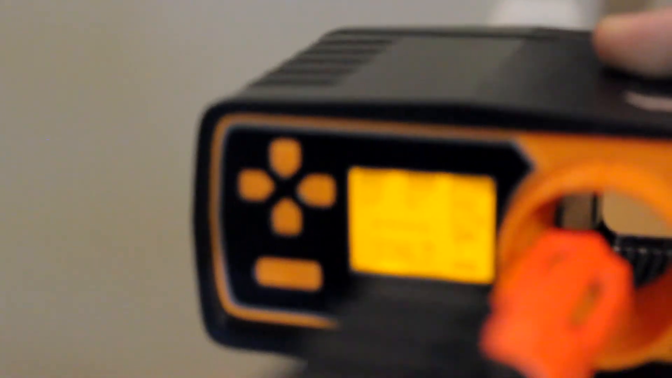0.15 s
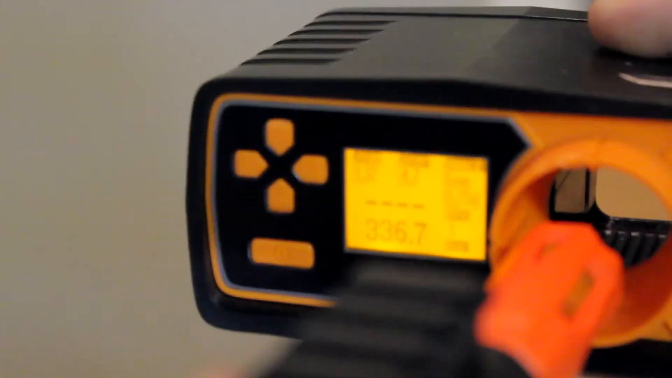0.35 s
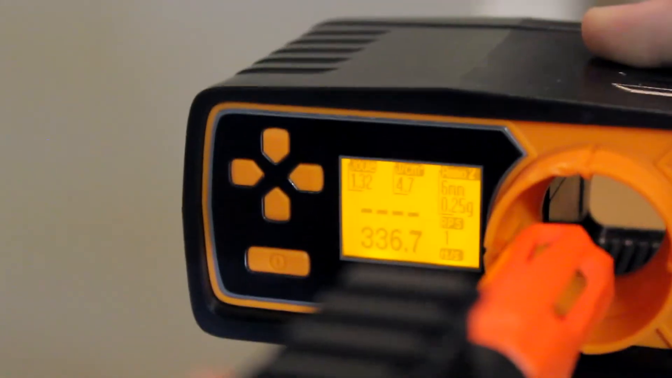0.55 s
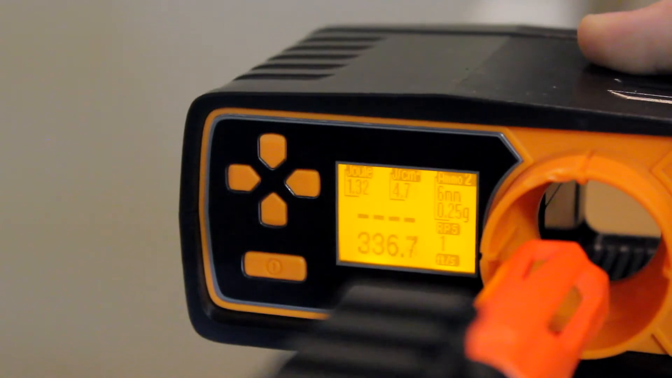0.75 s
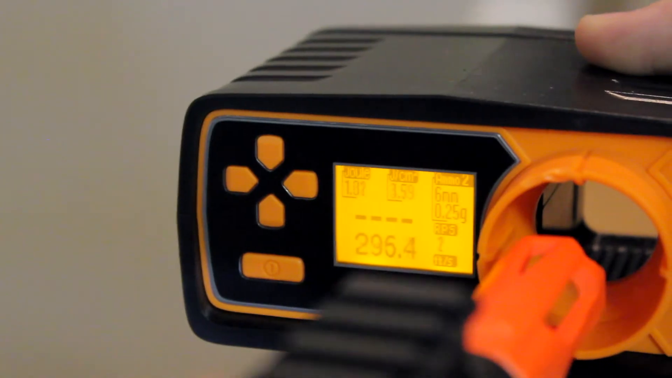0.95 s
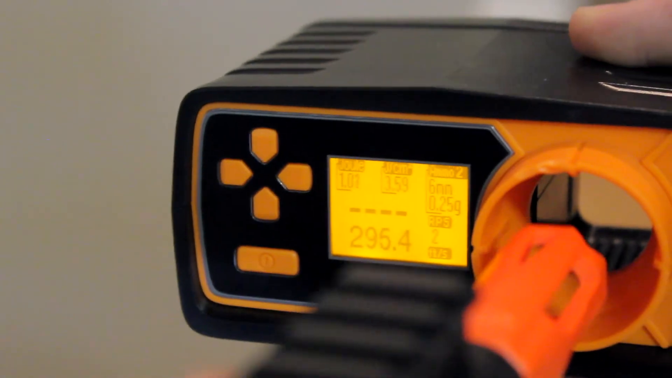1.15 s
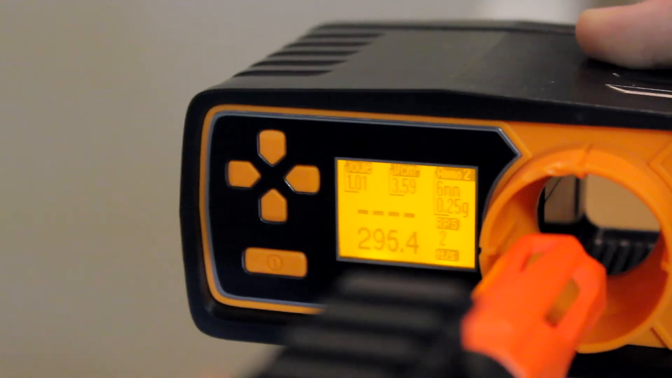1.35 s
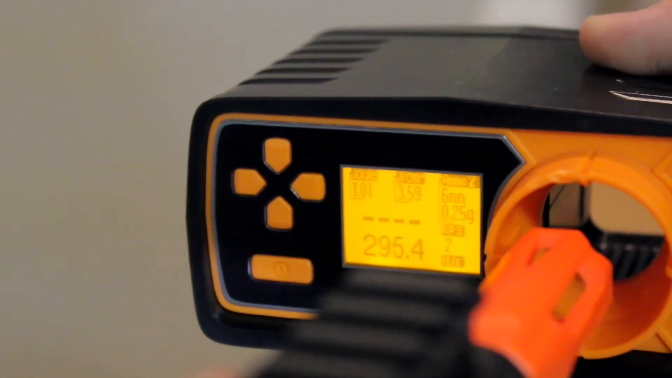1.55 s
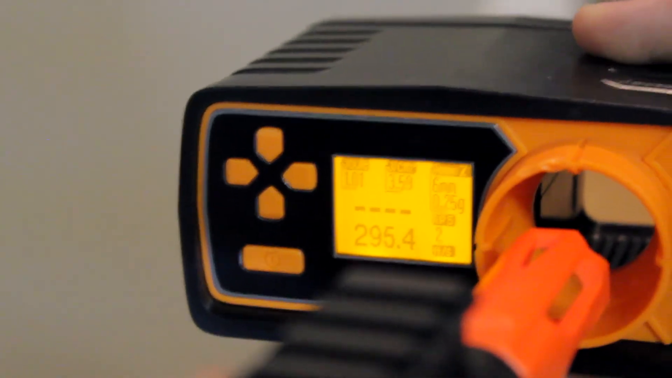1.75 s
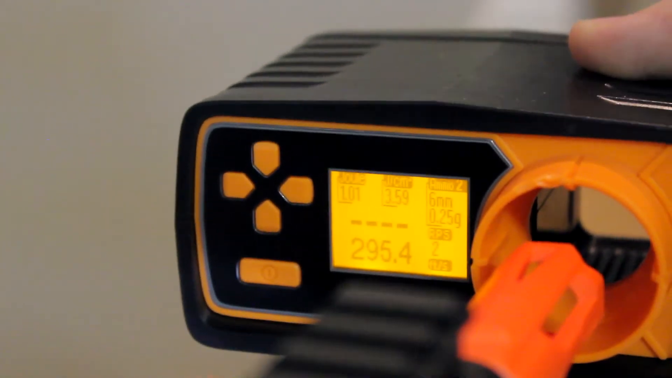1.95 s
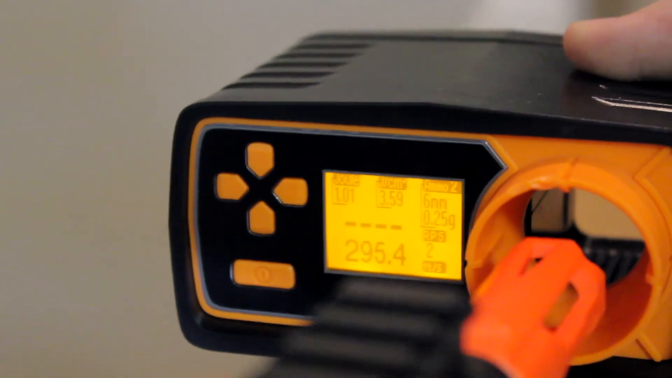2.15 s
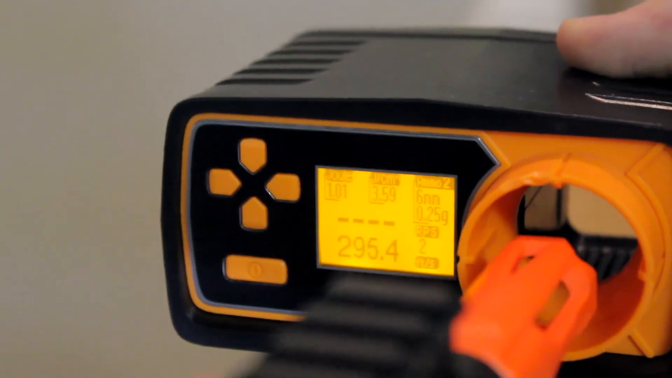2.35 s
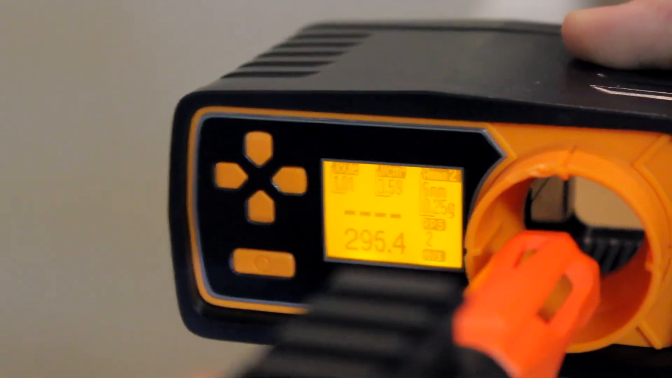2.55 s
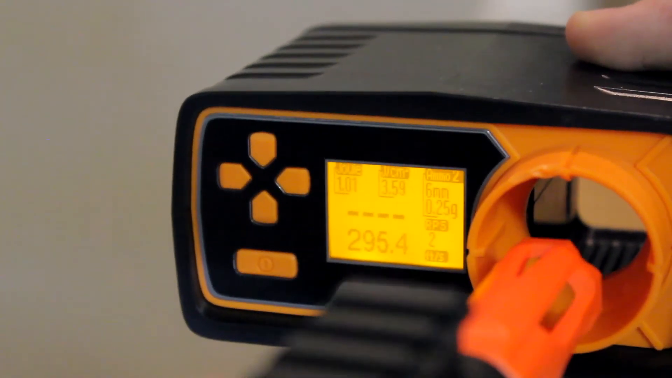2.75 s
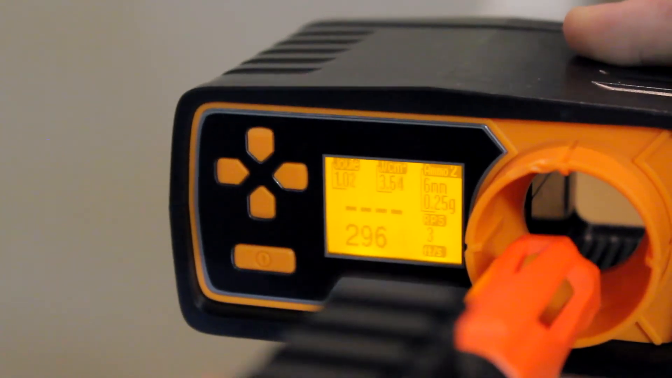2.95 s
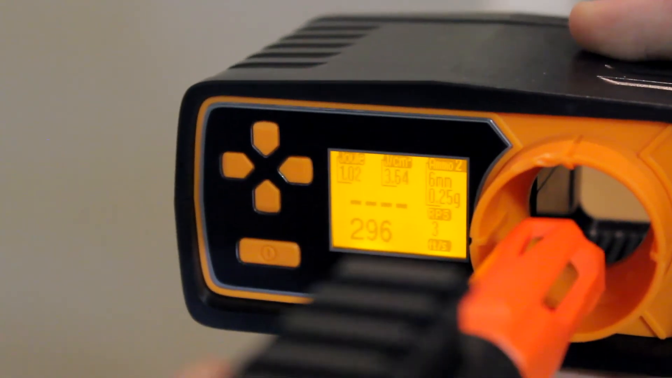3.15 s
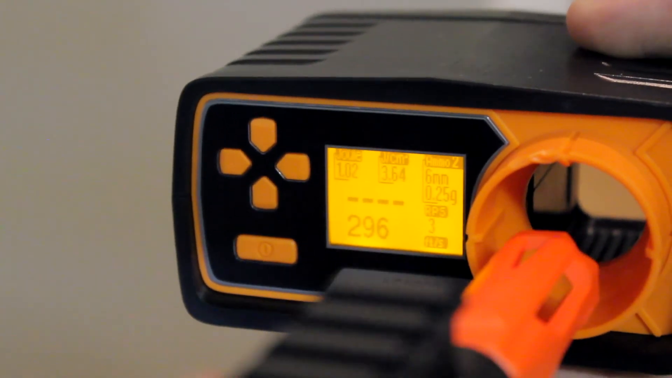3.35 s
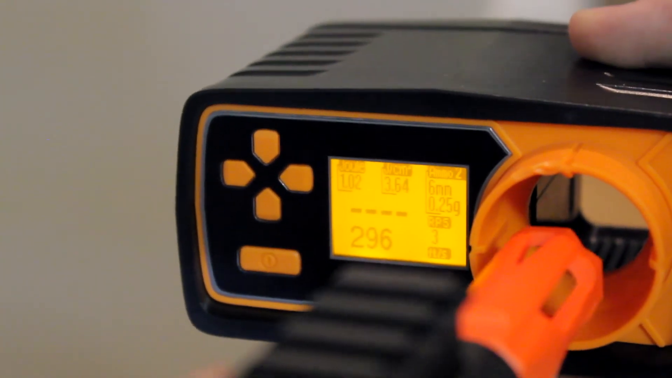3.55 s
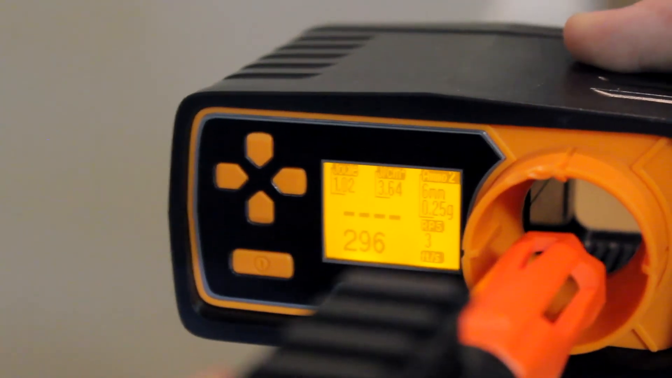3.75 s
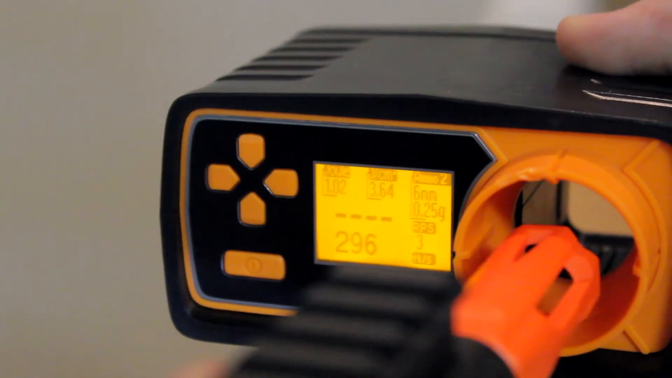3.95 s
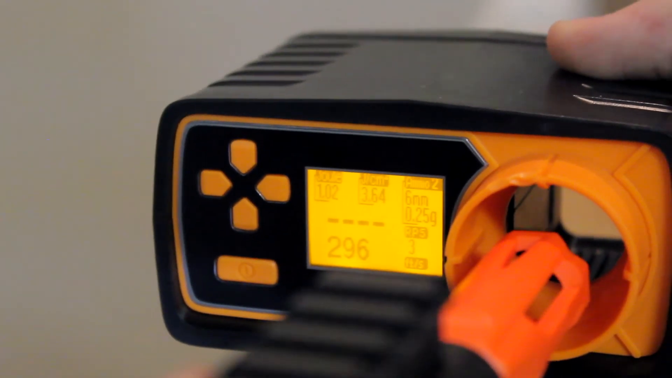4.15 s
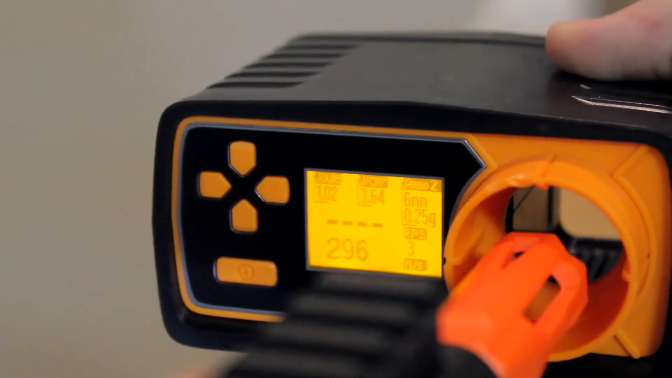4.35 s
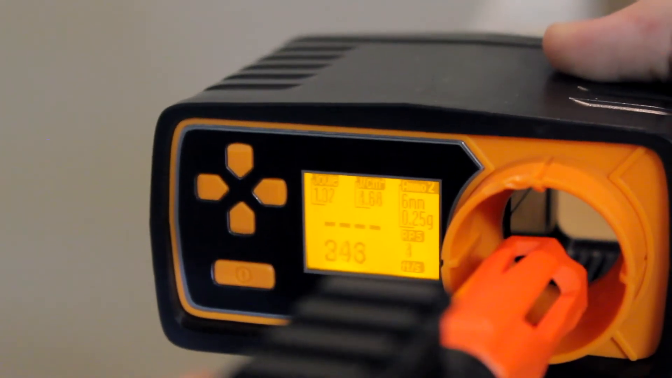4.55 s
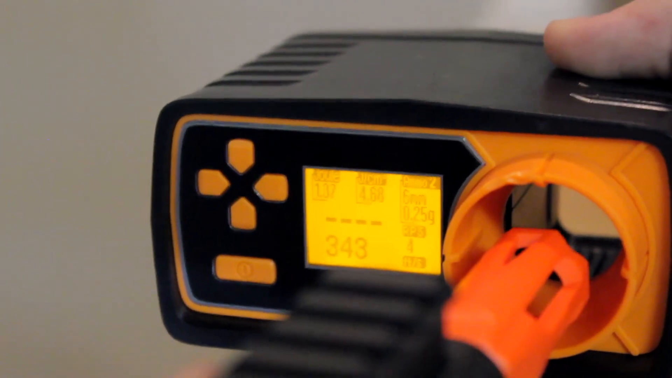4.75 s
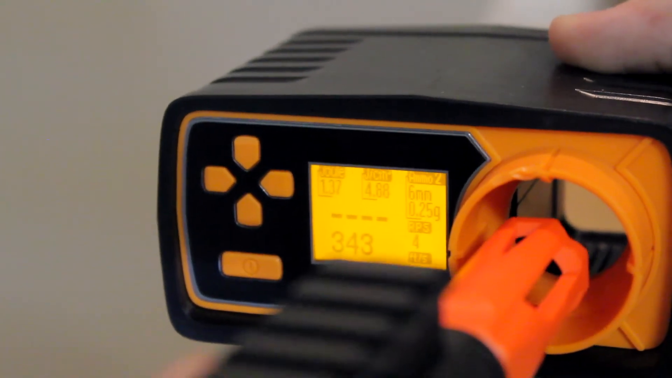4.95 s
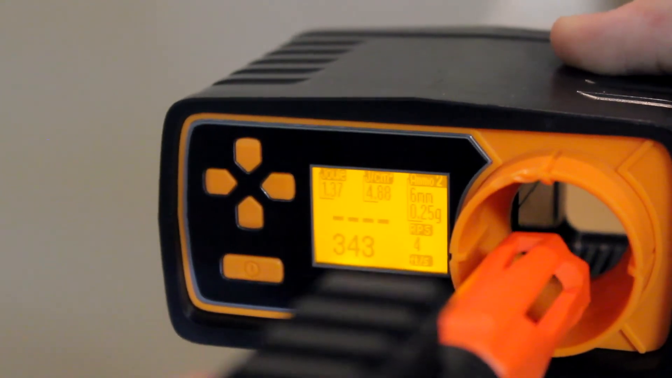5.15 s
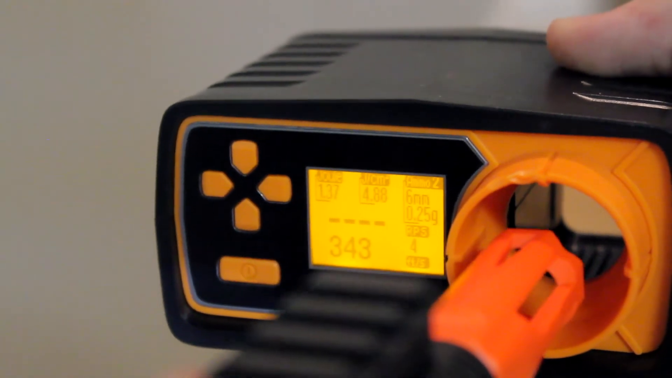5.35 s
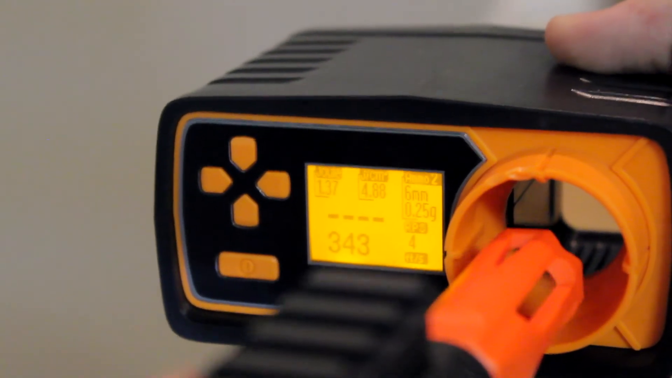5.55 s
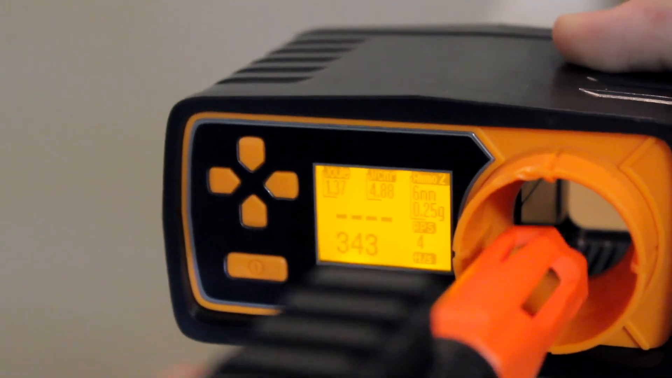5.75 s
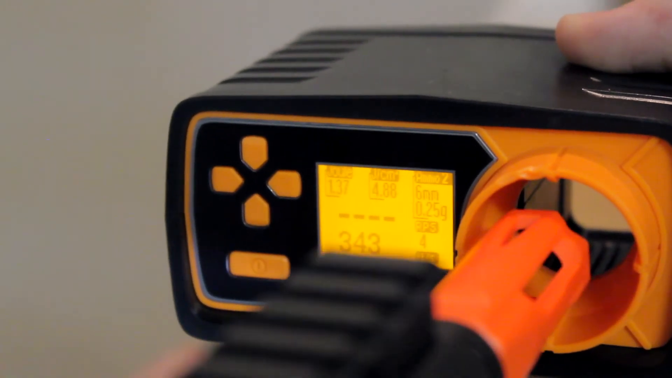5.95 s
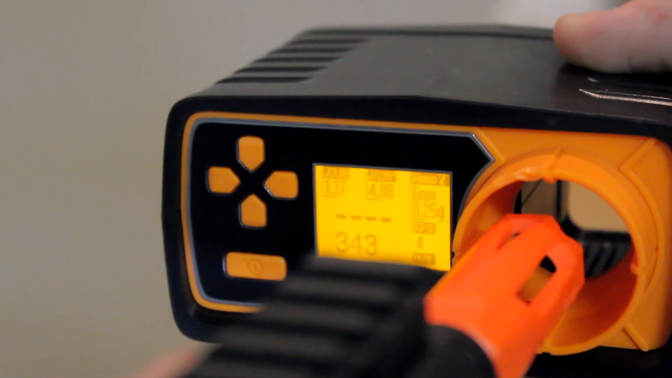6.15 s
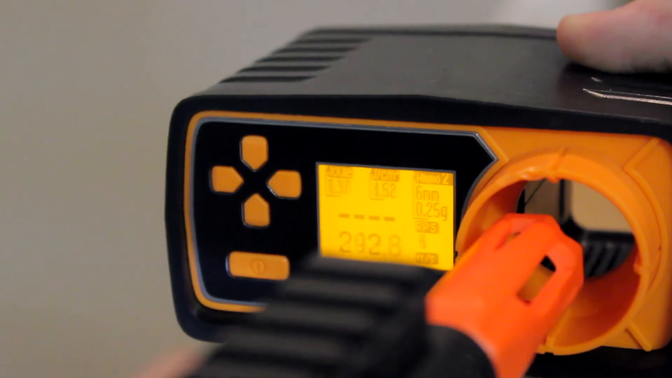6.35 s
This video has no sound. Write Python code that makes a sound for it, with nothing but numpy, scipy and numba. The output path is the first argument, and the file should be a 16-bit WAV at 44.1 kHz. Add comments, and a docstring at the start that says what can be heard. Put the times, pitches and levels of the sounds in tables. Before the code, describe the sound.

Quiet hiss and low hum, then four sharp, clattering shots roughly two seconds apart from an electric airsoft gun. Motor gears zip upward, the piston snaps with a metallic ring, and the pellet smacks a hard panel a moment later, almost a double crack. Light ricochet clicks follow, with soft rustles before the last shot. A camera's close stereo microphones squash the peaks and let the short, bright room echo bloom.

```python
"""An electric airsoft rifle fires four single shots close to a camera's two microphones in a small hard room.
The motor winds the gears up in a rising whine, air puffs out and the piston slams with a metallic ring.
Each pellet cracks on a backstop; in between, bounces rattle and now and then something rings.
Wall echo is decaying noise convolved with the dry sounds; hiss and a wavering hum lie beneath.
The camera's limiter pulls each shot down and lets the echo swell back."""
import sys
import numpy as np
from scipy import signal
from scipy.fft import rfft, irfft, next_fast_len
from scipy.io import wavfile
from scipy.ndimage import uniform_filter1d
from numba import njit

SR = 44100
rng = np.random.default_rng(int(sys.argv[2]) if len(sys.argv) > 2 else 0)


def master_out(mix):
    """Clip the mix to full scale and print it as 16-bit PCM to the path in sys.argv[1]."""
    frames = np.transpose(np.atleast_2d(mix))
    ceiling = np.clip(frames, -1, 1)
    pcm = np.round(ceiling * 32767).astype(np.int16)
    wavfile.write(sys.argv[1], SR, pcm)


N = 282323  # samples

# All event levels are ahead of echo, microphone placement and limiter.
# Spectra give relative level per Hz; colour() brings noise back to its own rms.

# Hiss spectrum: [f/Hz, relative level/dB]
HISS_SPECTRUM = [(25, -7), (60, -11), (100, -2.5), (200, -4.5), (500, -9), (1500, -12), (5000, -17),
                 (10000, -23.5), (15500, -31.5)]
# Likeness of the hiss at the two microphones: [f/Hz, correlation]
HISS_LIKENESS = [(60, 0.4), (130, 0.39), (290, -0.19), (640, -0.084), (1410, -0.35), (3100, -0.3),
                 (6820, -0.3), (15000, -0.06)]
# Steady part of each hum tone: [f/Hz, peak level/dB]
HUM_TONES = [(40, -73), (121, -65), (540, -72.5), (720, -76.5)]
# Soft rustles, low thuds and, at the start, the dying tail of an earlier sound:
# [t/s, level/dB, centre f/Hz, rise/s, fall/s]
SOFT_SWELLS = [(0.0, -56, 240, .001, 0.062), (1.12, -57, 203, 0.023, 0.037), (3.661, -58, 260, 0.011, 0.02),
               (4.97, -52.5, 3200, 0.017, 0.068), (5.314, -48, 2950, 0.029, 0.059),
               (5.345, -45.5, 170, 0.0045, 0.0088)]

# Trigger pulls: [t/s, gear level/dB]
TRIGGER_PULLS = [(0.621, -13.5), (2.583, -12.5), (4.359, -11.5), (6.143, -13)]
# Piston slams: [t/s, puff level/dB, slam level/dB, rattle level/dB, shell ring f/Hz, shell ring level/dB]
PISTON_SLAMS = [(0.6603, -4, 17.5, -2.5, 4070, -1.5), (2.6476, -6.5, 17.5, 0, 4065, -1.5),
                (4.397, -4.5, 20, 1, 5480, -1), (6.2083, -7, 14.5, 0, 3980, -6)]
# Gearbox noise spectrum: [f/Hz, relative level/dB]
GEARBOX_SPECTRUM = [(88, -66.5), (150, -37), (850, -9), (1460, -8), (2140, -3), (2750, -4), (3750, -2),
                    (5510, -10), (6550, -16.5), (7080, -13.5), (15000, -36)]
# Air puff spectrum: [f/Hz, relative level/dB]
PUFF_SPECTRUM = [(40, -29.5), (80, -4), (160, 2.5), (500, -1), (1000, -7.5), (2500, -28.5)]
# Piston slam spectrum: [f/Hz, relative level/dB]
SLAM_SPECTRUM = [(59, -40.5), (100, -11.5), (462, -1.5), (1350, -2), (2990, -7), (3920, -6), (8170, -15),
                 (8880, -16.5), (9860, -14.5), (11400, -25.5), (15000, -29.5)]

# Pellets on the backstop: [t/s, level/dB]
BACKSTOP_STRIKES = [(0.7025, 15), (2.689, 16), (4.4346, 15.5), (6.25, 14.5)]
# Backstop crack spectrum: [f/Hz, relative level/dB]
CRACK_SPECTRUM = [(35, -33.5), (60, -5), (679, 0), (1270, 1.5), (2650, -6.5), (3190, -4), (4410, -10),
                  (5820, -16.5), (10100, -32), (13400, -42), (15000, -92)]
# Backstop panel modes, under the strike level: [f/Hz, level/dB, t60/s]
PANEL_MODES = [(147.7, -32.5, 0.13), (245, -33.5, 0.22), (337.1, -27, 0.15), (384, -28, 0.14),
               (482.5, -31, 0.096), (584, -28.5, 0.2), (1015, -55.5, 1.0), (1240, -19, 0.024),
               (3320, -17, .015)]
# Pellet bounces: [t/s, level/dB, brightest f/Hz, low knock relative to the brightest/dB,
# fall above the brightest/(dB per octave), left minus right/dB, echo relative to direct/dB]
PELLET_BOUNCES = [(0.79, -3.5, 3020, -6, 13, -8, 1.5), (0.819, -13.5, 3500, -3, 10, 6, 3.5),
                  (1.197, -15.5, 4500, -10, 23, -5, 4), (1.498, -19.5, 1350, -8, 14, -5, 1.5),
                  (1.7257, -10, 10000, -10, 4, -3, 2), (1.7285, -8, 3900, 4, 40, -3.5, 3.5),
                  (1.7415, -12, 9000, 0, 6, -5, 0), (1.9555, -20.5, 1100, -10, 15, -3, 1),
                  (2.323, -36.5, 850, -2, 16, -3, 5.5), (2.829, -20, 3730, -11, 13, -1, 5),
                  (2.889, -28.5, 4040, -4, 12, 1, 12.5), (3.414, -42, 2480, -1, 10, -8, 2.2),
                  (4.676, -29.5, 3640, -2, 12, 0, 11), (4.957, -48, 980, -15, 17, -2, 7),
                  (5.715, -43.5, 1800, -3, 15, -4.5, 4)]
# Short pitched rings: [t/s, f/Hz, level/dB, t60/s]
SHORT_RINGS = [(1.2, 5100, -32, 0.025), (1.729, 4120, -29.5, 0.1), (1.729, 1050, -25, 0.07),
               (1.729, 512, -28, 0.07), (1.727, 3120, -28, 0.06), (5.714, 1240, -53, 0.09),
               (5.716, 2650, -56.5, 0.08)]

# Left microphone port against the right: [f/Hz, level gained/dB]
LEFT_PORT_TILT = [(1500, -1.5), (5000, 2), (12000, 3.5)]
# Left microphone port against the right: [f/Hz, phase lead/rad]
LEFT_PORT_PHASE = [(2000, 0), (4900, 0), (8000, -1.74), (11000, -1.5), (15000, -4.5)]
# Decay of the echo's first slope: [f/Hz, t60/s]
ROOM_T60 = [(100, 0.22), (300, 0.36), (1000, 0.3), (3500, 0.3), (8000, 0.32), (15000, 0.13)]
# Likeness of the echo at the two microphones: [f/Hz, correlation]
ROOM_LIKENESS = [(60, 0.46), (130, 0.97), (290, 1), (640, 0.87), (1410, 1), (3100, 0.52), (6820, 0.79),
                 (15000, -0.42)]

HISS_DB = -55.5  # rms, ahead of the left-right balance
MESH_HZ, SPIN_UP_S, COAST_S = 2550, .028, .02  # full-speed tooth rate; time constants of start and stop
PUFF_LEAD_S = .006  # the air leaves the barrel just before the piston lands
KNOCK_HZ, DIP_DB = 460, -3  # low knock of every bounce; hollow between it and the bright part
BOUNCE_S, SMEAR_S_PER_DB = .004, .001  # a bounce with more echo is farther off and more drawn out
SLOPE_DB, SLOPE_SLOWER = -26, 2.11  # a faint, slower slope of the same wall echo; factor on its decay time
TOP_HZ = 15620  # upper edge of what the camera keeps


def undb(db):
    """Gain of a level in dB."""
    return 10 ** (np.asarray(db) / 20)


def at_hz(table, hz):
    """Read a table of [f/Hz, value] on a log-frequency axis."""
    f, v = np.transpose(table)
    return np.interp(np.log(hz + 1), np.log(f), v)


def bin_hz(size):
    """Frequency of each bin of a real spectrum."""
    return np.arange(size // 2 + 1) * SR / size


def colour(x, table):
    """Shape the last axis of x by a spectrum; noise of rms 1 keeps rms 1."""
    n = x.shape[-1]
    gain = undb(at_hz(table, bin_hz(n)))
    return irfft(rfft(x) * gain / np.sqrt(np.mean(gain ** 2)), n)


def pair(size, alike):
    """Left and right noise, correlated in each band as the table says, by weighting mid and side."""
    likeness = np.clip(at_hz(alike, bin_hz(size)), -.99, .99)
    weights = np.sqrt([(1 + likeness) / 2, (1 - likeness) / 2])
    mid, side = rfft(rng.standard_normal((2, size))) * weights
    return irfft([mid + side, mid - side], size)


def add(out, sound, s):
    """Mix a sound in from time s on."""
    i = int(s * SR)
    sound = sound[..., :N - i]
    out[..., i:i + sound.shape[-1]] += sound


def burst(table, rise_s, fall_s, grit_db=0, size=4096):
    """Coloured noise that swells and dies; grit breaks it into separate knocks."""
    t = np.arange(size) / SR
    shape = (1 - np.exp(-t / rise_s)) * np.exp(-t / fall_s)
    knocks = undb(grit_db * np.repeat(rng.standard_normal(size // 32), 32))
    sound = colour(knocks * rng.standard_normal(size), table) * shape
    return sound * np.linalg.norm(shape) / np.linalg.norm(sound)  # same energy on every draw


def blow(table, rise_s, fall_s, grit_db):
    """A burst heard directly, and a smooth click of the same energy and colour, which feeds the wall echo."""
    direct = burst(table, rise_s, fall_s, grit_db)
    click = colour(signal.unit_impulse(len(direct), 128), table)
    return np.array([direct, click * np.linalg.norm(direct)])


def ringing(t, hz, db, t60):
    """A struck mode: a sine that falls 60 dB in t60."""
    return undb(db) * np.sin(2 * np.pi * hz * t) * np.exp(-np.log(1000) * t / t60)


def place(x, pan_db):
    """Two microphone ports at unlike levels; in the treble the left one lags and gains level."""
    size = next_fast_len(len(x))
    hz = bin_hz(size)
    port = undb(at_hz(LEFT_PORT_TILT, hz)) * np.exp(1j * at_hz(LEFT_PORT_PHASE, hz))
    left = irfft(rfft(x, size) * port, size)[:len(x)]
    return np.array([left * undb(pan_db / 2), x * undb(-pan_db / 2)])


def background():
    """Microphone hiss as coloured noise, and hum tones whose level and phase waver at random."""
    t = np.arange(N) / SR
    noise = pair(next_fast_len(N), HISS_LIKENESS)
    hiss = undb(HISS_DB) * colour(noise, HISS_SPECTRUM)[:, :N]
    # smoothing over 2000 samples shrinks the noise about 45 times
    waver = uniform_filter1d(rng.standard_normal((len(HUM_TONES), 2, N)), size=2000) * 45
    hum = 0
    for (hz, db), (a, b) in zip(HUM_TONES, waver):
        in_phase = (1 + .6 * a) * np.sin(2 * np.pi * hz * t)
        quadrature = 0.2 * b * np.cos(2 * np.pi * hz * t)
        hum = hum + undb(db) * (in_phase + quadrature)
    return (hiss + hum) * undb([[-.9], [.9]])


def soft_swells():
    """An earlier sound's dying tail, then rustles and thuds: noise around one centre, stronger to the right."""
    out = np.zeros(N)
    for s, db, hz, rise, fall in SOFT_SWELLS:
        tone = [(hz / 3, -18), (hz, 0), (hz * 2.5, -16)]
        add(out, undb(db) * burst(tone, rise, fall, size=16384), s)
    return place(out, -6.5)


def gears(run_s):
    """Teeth click faster as the motor spins up against the spring; it coasts once the piston lets go."""
    t = np.arange(8192) / SR
    speed = (1 - np.exp(-t / SPIN_UP_S)) * np.exp(-np.maximum(t - run_s, 0) / COAST_S)
    wobble = uniform_filter1d(rng.standard_normal(len(t)), size=64)
    tooth = np.cumsum(MESH_HZ * speed * (1 + 0.43 * wobble)) / SR  # teeth passed so far
    whine = 0
    for multiple, db in ((.5, -11), (1, -4.0), (2, -6)):
        whine = whine + undb(db) * np.sin(2 * np.pi * multiple * tooth)
    grind = burst(GEARBOX_SPECTRUM, 1e-4, 1e3, grit_db=0.5, size=8192)  # noise of sliding teeth
    return (whine + grind) * speed ** 1.63


def rifle():
    """Wind-up, puff of air, slam, and the shaking that follows; rows: direct sound, sound for the walls."""
    out = np.zeros((2, N))
    for (trigger, gears_db), pull_end in zip(TRIGGER_PULLS, PISTON_SLAMS):
        slam, puff_db, slam_db, rattle_db, shell_hz, shell_db = pull_end
        add(out, undb(gears_db) * gears(slam - trigger), trigger)
        add(out, undb(puff_db) * burst(PUFF_SPECTRUM, 0.003, 0.018), slam - PUFF_LEAD_S)
        add(out, undb(slam_db) * blow(SLAM_SPECTRUM, 0.0035, 0.0032, grit_db=3.0), slam)
        # spring and gears shake
        rattle = burst(GEARBOX_SPECTRUM, 0.0021, 0.023, grit_db=1.5, size=8192)
        add(out, undb(rattle_db) * rattle, slam)
        # the metal shell rings on, as a narrow band of noise
        shell = [(shell_hz * .7, -24), (shell_hz, 0), (shell_hz * 1.5, -24)]
        add(out, undb(shell_db) * burst(shell, 0.0016, 0.024, grit_db=3.0, size=16384), slam)
    return out


def backstop():
    """A hard crack, then the panel's modes ringing out; rows: direct sound, sound for the walls."""
    t = np.arange(16384) / SR
    panel = sum(ringing(t, hz, db, t60) for hz, db, t60 in PANEL_MODES)
    out = np.array([panel, panel])
    add(out, blow(CRACK_SPECTRUM, .0012, .0022, grit_db=3.), 0)
    return out


def bounces():
    """Each bounce is a short rattle of knocks in the colour of what the pellet lands on."""
    direct, walls = np.zeros((2, N)), np.zeros(N)
    for s, db, hz, knock_db, fall_db, pan_db, echo_db in PELLET_BOUNCES:
        hollow = (np.sqrt(hz * KNOCK_HZ), knock_db / 2 + DIP_DB)
        tone = [(150, knock_db - 22), (KNOCK_HZ, knock_db), hollow, (hz, 0), (hz * 2 ** 4, -4 * fall_db)]
        length = max(BOUNCE_S + SMEAR_S_PER_DB * echo_db, .002)
        near, spread = undb(db) * blow(tone, length / 3, length / 2, grit_db=2.5)
        add(direct, place(near, pan_db), s)
        add(walls, undb(echo_db) * spread, s)
    return direct, walls


def rings():
    """Things that a pellet sets ringing for a moment, as decaying sines."""
    out, t = np.zeros(N), np.arange(16384) / SR
    for s, hz, db, t60 in SHORT_RINGS:
        add(out, ringing(t, hz, db, t60), s)
    return out


def fade(x):
    """Fall of the echo over x decay times: a quick slope and a fainter, slower one."""
    return np.exp(-np.log(1000) * x) + undb(SLOPE_DB) * np.exp(-np.log(1000) * x / SLOPE_SLOWER)


def room(x, wet_db, build_s):
    """The echo of the walls: noise that dies at its own rate in each half octave."""
    size = 24576
    t = np.arange(size) / SR
    noise = rfft(pair(size, ROOM_LIKENESS))
    octave = np.log2(bin_hz(size) + 1)
    echo = 0
    for centre in np.arange(5, 14.6, .5):
        band = irfft(noise * np.clip(1 - 2 * np.abs(octave - centre), 0, 1), size)
        # reflections come in clumps, different in every band
        clumps = uniform_filter1d(np.repeat(rng.standard_normal(size // 512), 512), size=512)
        echo = echo + undb(2.175 * clumps) * band * fade(t / at_hz(ROOM_T60, 2 ** centre))
    balance_db = np.array([[-2.6], [2.6]])  # left, right
    echo = echo * (1 - np.exp(-t / build_s)) * undb(wet_db + balance_db)
    return signal.fftconvolve(x[None], echo, axes=1)[:, :N]


def scene():
    """Rifle close by and backstop, both a little to the right, with the walls' echo and the background."""
    floor, soft = background(), soft_swells()
    gun, panel = rifle(), np.zeros((2, N))
    for s, db in BACKSTOP_STRIKES:
        add(panel, undb(db) * backstop(), s)
    small, small_walls = bounces()
    ring = rings()
    to_walls = undb(-0.5) * gun[1] + panel[1] + small_walls + ring
    echo = room(to_walls, wet_db=-33.5, build_s=0.0018)
    air = place(gun[0] + panel[0] + ring, -5.0) + small + echo + soft
    bass_hz, treble_hz = 95, 13000  # the small microphones lose the deep bass and the top
    microphone = signal.butter(3, [bass_hz, treble_hz], "band", fs=SR, output="sos")
    return signal.sosfilt(microphone, air) + floor


@njit
def follow(x, attack, release):
    """Envelope that rises fast and falls slowly."""
    e, out = 1e-9, np.empty(len(x))
    for i in range(len(x)):
        e += (x[i] - e) * (attack if x[i] > e else release)
        out[i] = e
    return out


def record(dry):
    """The limiter turns loud sound down and recovers slowly; what slips past it clips; the top is cut."""
    attack_s, release_s, top_db = .001, .047, -10
    loud = follow(np.abs(dry).max(axis=0), 1 / (attack_s * SR), 1 / (release_s * SR))
    gain = np.minimum(1, undb(top_db) / loud)
    held = np.clip(dry * gain, -1, 1)
    return signal.sosfilt(signal.ellip(10, .2, 70, TOP_HZ, fs=SR, output="sos"), held)


dry = scene()
out = record(dry)
master_out(out)
```